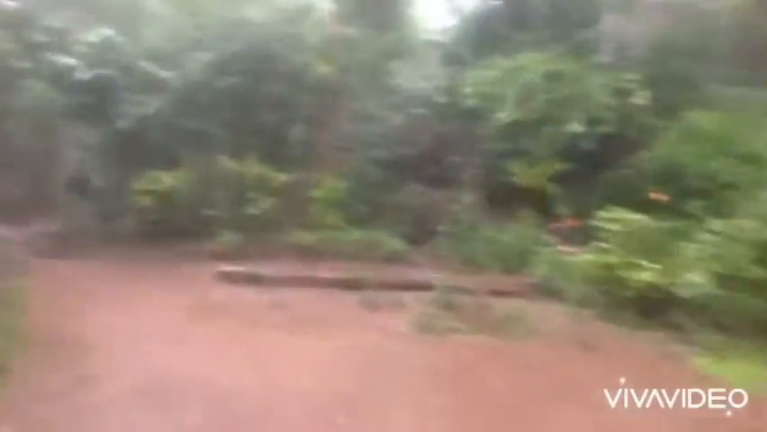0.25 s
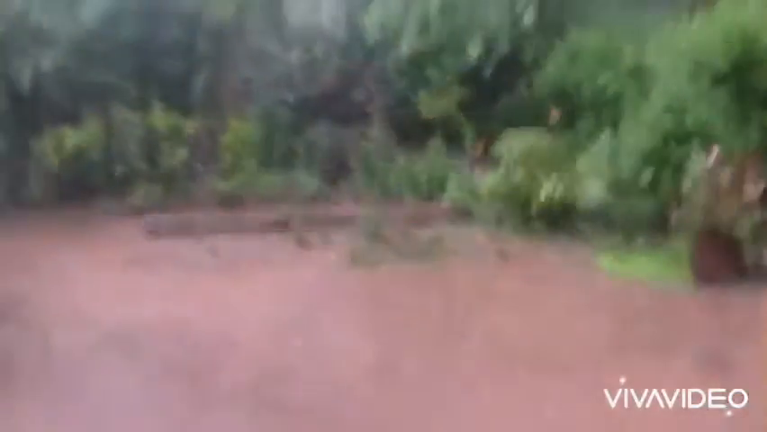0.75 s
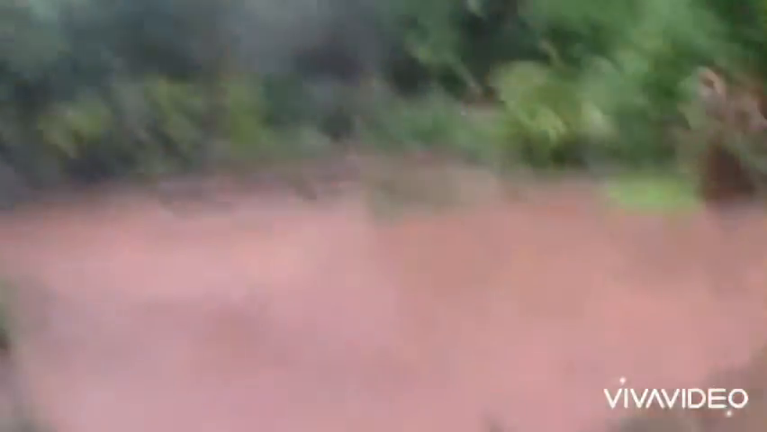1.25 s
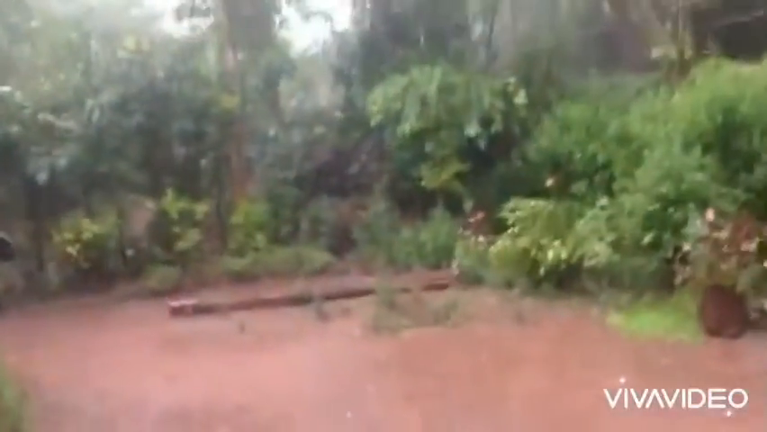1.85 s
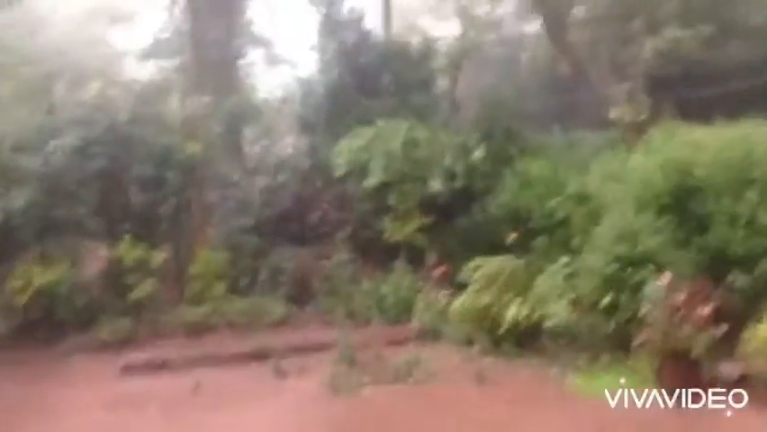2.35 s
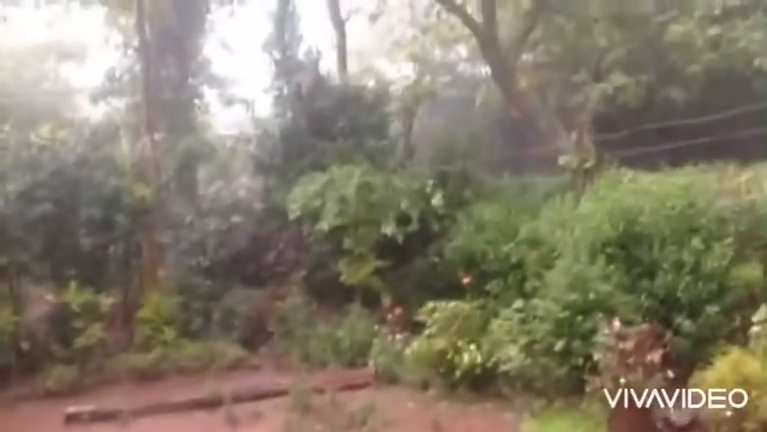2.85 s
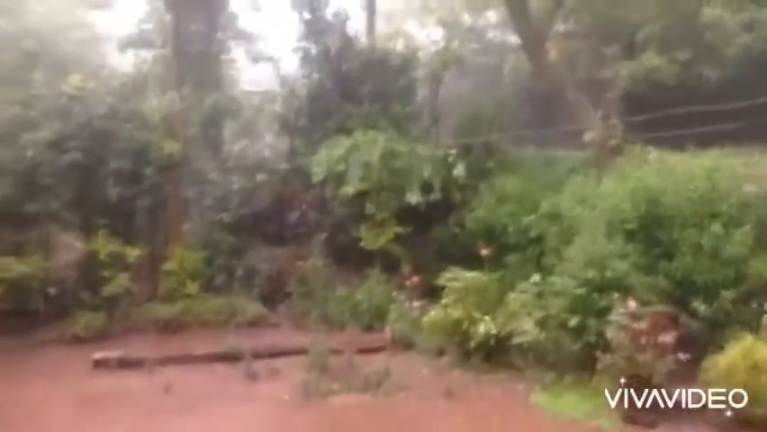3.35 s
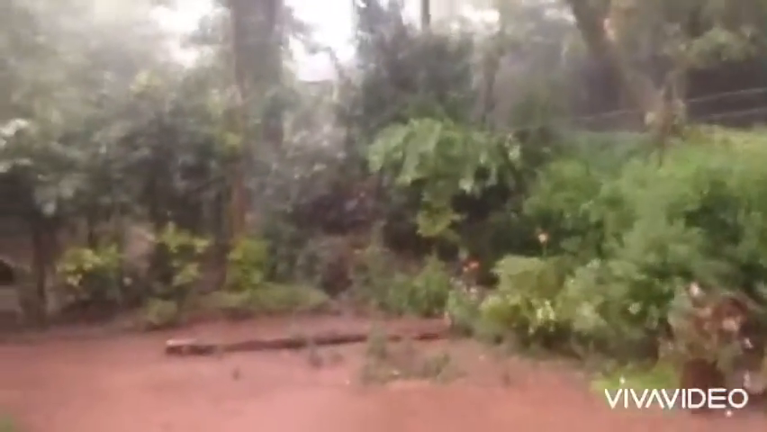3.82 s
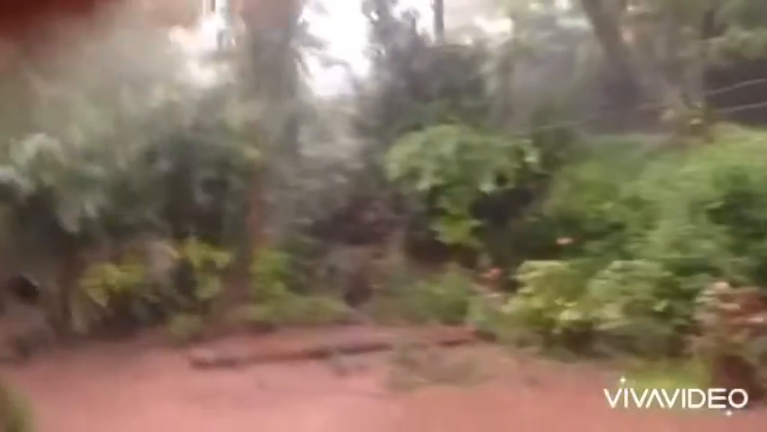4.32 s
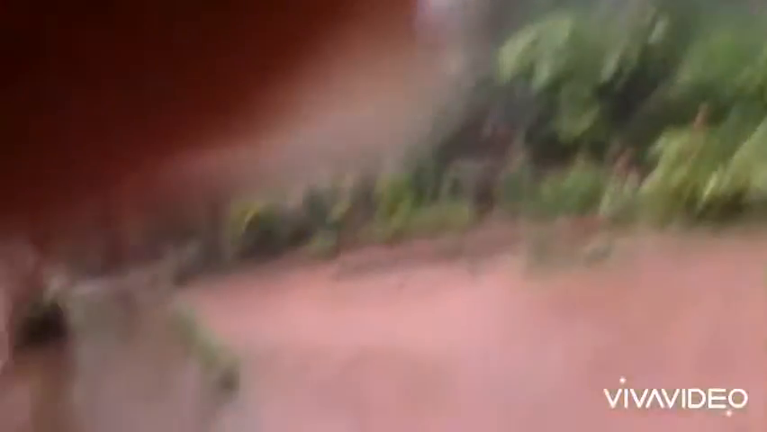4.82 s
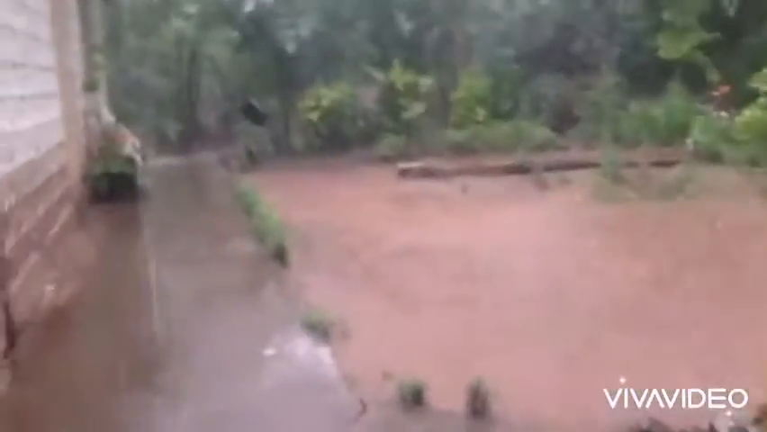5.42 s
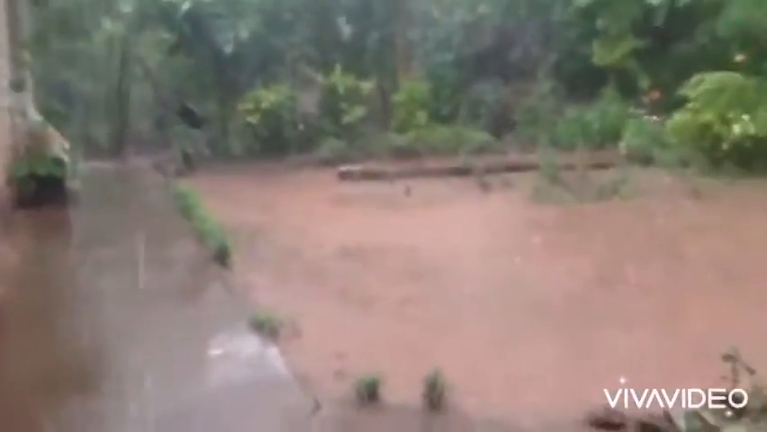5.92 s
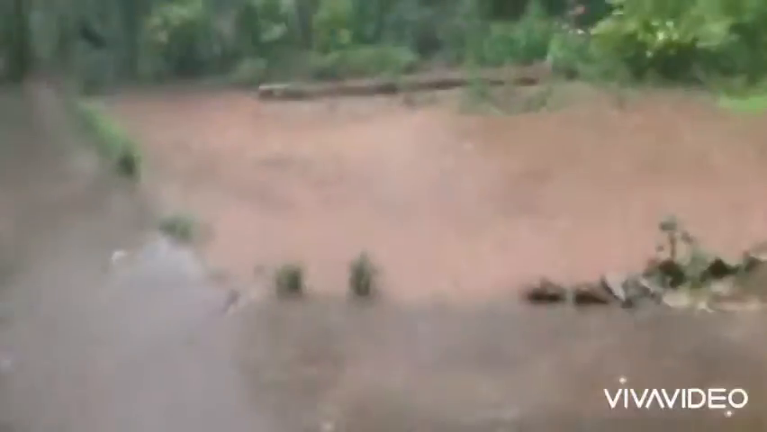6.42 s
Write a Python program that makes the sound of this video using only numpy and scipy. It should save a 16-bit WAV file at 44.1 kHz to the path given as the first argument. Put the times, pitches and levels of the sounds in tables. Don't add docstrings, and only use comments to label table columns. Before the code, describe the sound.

A heavy, unbroken downpour fills a flooded yard, heard from a porch on a single phone microphone: a dense midrange wash, crackling nearer drops and fine hiss, band-limited at the top. Sharp water slaps land close by at about 0.3 s and, much louder, at 0.5 s, ringing wetly with short echoes from walls. More follow near 0.9 s, a looser swelling spill around 1.5 s, and a heavier, lower slap at 1.75 s. Smaller splashes come at 2.0, 2.8, 3.4 and 3.6 s, while the rain grows slightly fuller. Around 4.2 s a bright splash and crisp ticks strike near. At 5.1 s the loudest slap bursts, nearly overloading; then the wash drops a little and single drops tick frequently until the end at about 6.7 s. Beneath, a roof sheet drums faintly with soft low thuds, and tiny drops patter.

```python
import sys
import numpy as np
from scipy import signal
from scipy.fft import rfft, irfft, next_fast_len
from scipy.io import wavfile
from scipy.ndimage import uniform_filter1d

SR = 44100
rng = np.random.default_rng(int(sys.argv[2]) if len(sys.argv) > 2 else 0)


def ratio(d):
    e = np.asarray(d, float) / 20
    return 10 ** e


def bounce(signal):
    frames = np.transpose(np.atleast_2d(signal))
    limited = np.clip(frames, -1, 1)
    pcm = np.round(limited * 32767).astype(np.int16)
    wavfile.write(sys.argv[1], SR, pcm)


N = 294147


def evened(x):
    return x / np.sqrt(np.mean(x ** 2) + 1e-20)


def read(points, hz):
    f, value = np.transpose(points)
    return np.interp(np.log(hz + 1), np.log(f + 1), value)


def over_time(table):
    s, *columns = np.transpose(table)
    return [np.interp(np.arange(N) / SR, s, column) for column in columns]


def filtered(x, points):
    size = next_fast_len(x.shape[-1])
    gain = ratio(read(points, np.fft.rfftfreq(size, 1 / SR)))
    return irfft(rfft(x, size) * gain, size)[..., :x.shape[-1]]


def coloured(x, points):
    return evened(filtered(x, points))


def resonate(x, hz, width):
    r = np.exp(-np.pi * width / SR)
    return signal.lfilter([1, 0, -1], [1, -2 * r * np.cos(2 * np.pi * hz / SR), r * r], x)


def layer(events):
    track = np.zeros(N)
    for s, sound in events:
        part = track[round(s * SR):][:len(sound)]
        part += sound[:len(part)]
    return track


def patchy(points, size, patchy_db, flicker_db):
    hop = size // 4
    frames, hz = N // hop + 5, np.fft.rfftfreq(size, 1 / SR)
    a, b, patches = rng.standard_normal((frames, len(hz), 3)).T
    patches = uniform_filter1d(patches, size=8, axis=0)
    patches = evened(uniform_filter1d(patches, size=24, axis=1))
    flicker = evened(uniform_filter1d(rng.standard_normal(frames), size=6))
    level_db = patchy_db * patches + flicker_db * flicker
    z = (a + 1j * b) * ratio(read(points, hz)[:, None] + level_db)
    return evened(signal.istft(z, nperseg=size, noverlap=size - hop)[1][:N])


def drops(per_s, spread_db, t60):
    size = ratio(spread_db * np.minimum(rng.exponential(1, N), 5))
    size = size * (rng.random(N) < per_s / SR)
    t = np.arange(3000) / SR
    power = signal.oaconvolve(size ** 2, ratio(-120 * t / t60))[:N]
    return evened(np.sqrt(abs(power)) * rng.standard_normal(N))


FIZZ_DB, HISS_DB = -40.5, -45
USUAL_POUR_DB = -28.5
FIZZ_FOLLOWS, HISS_FOLLOWS = 0.75, 0.2
FIZZ_NEAR, HISS_NEAR = 0.8, 1.2
# (time [s], strength [dB], closeness of the spray [dB])
POUR_RIDE = [(0.0, -28.5, -1.5), (0.95, -26.5, -0.5), (1.32, -30, 2), (1.56, -29.5, -1.5),
             (1.71, -28.5, 1.5), (1.82, -28, 2), (2.47, -29, 0.5), (2.73, -27.5, 2), (3.36, -27, 0.0),
             (3.66, -26, 1.5), (4.18, -26.5, 2.5), (5.11, -28.5, 1.5), (5.24, -31.5, -1),
             (5.48, -31.5, 0.5), (5.98, -30, 0.5), (6.67, -32.5, 1.5)]
# (frequency [Hz], level [dB per Hz])
WASH_SPECTRUM = [(180, -23.5), (300, -4), (450, -5.5), (650, -3), (900, -0.5), (1500, 0.5), (2000, 1),
                 (2400, 0.5), (2650, -5), (2850, -10.5), (3300, -24.5), (4300, -47), (7000, -100)]
# (frequency [Hz], level [dB per Hz])
FIZZ_SPECTRUM = [(1500, -10), (2700, 1), (3300, 6.5), (4500, 3), (5500, -5), (7000, -12), (9000, -38)]
# (frequency [Hz], level [dB per Hz])
HISS_SPECTRUM = [(3000, -43), (5000, 5), (6500, 2.5), (8000, 2), (9400, 1.5), (10000, -7), (10700, -53)]


def downpour():
    wash_db, close_db = over_time(POUR_RIDE)
    change_db = wash_db - USUAL_POUR_DB
    fizz_db = FIZZ_DB + FIZZ_FOLLOWS * change_db + FIZZ_NEAR * close_db
    hiss_db = HISS_DB + HISS_FOLLOWS * change_db + HISS_NEAR * close_db
    near = drops(per_s=400, spread_db=1.0, t60=0.04)
    wash = patchy(WASH_SPECTRUM, size=512, patchy_db=1.0, flicker_db=0.17)
    wash = evened(wash + ratio(-14.5) * coloured(near, WASH_SPECTRUM))
    fizz = patchy(FIZZ_SPECTRUM, size=256, patchy_db=0.0, flicker_db=1.06)
    fizz = evened(fizz + ratio(-16.5) * coloured(near, FIZZ_SPECTRUM))
    hiss = patchy(HISS_SPECTRUM, size=256, patchy_db=2.6, flicker_db=0.4)
    hiss = evened(hiss + coloured(near, HISS_SPECTRUM))
    return ratio(wash_db + 0.07) * wash + ratio(fizz_db) * fizz + ratio(hiss_db) * hiss


YARD_DB, YARD_LONGER = -15.5, 3.1
# (frequency [Hz], level [dB per Hz])
SPRAY_SPECTRUM = [(2000, -8), (3000, 7), (4500, 2.5), (6000, -3.5), (9300, -7.5), (10000, -14),
                  (10700, -41)]


def splash(db, hz, low_db, spray_db, t60, rise, weight):
    t = np.arange(SR // 2) / SR
    a, b, c = rng.standard_normal((len(t), 3)).T
    yard = ratio(YARD_DB + 60 * t / t60 * (1 - 1 / YARD_LONGER))
    swell = (1 - np.exp(-(t / rise) ** 2)) * (1 + yard)
    fade = ratio(-60 * t / t60)
    body = evened(resonate(coloured(a, WASH_SPECTRUM), hz, width=1400)) * fade
    low = ratio(low_db - 0.5) * coloured(b, weight) * fade
    spray = ratio(spray_db) * coloured(c, SPRAY_SPECTRUM) * ratio(-60 * t / (0.98 * t60))
    return ratio(db - 7.5) * swell * (body + low + spray)


# (time [s], peak [dB], ring [Hz], low weight [dB], spray [dB])
SLAP_EVENTS = [(0.077, -14, 2110, -18, -12.5), (.267, -18, 1690, -30, -25), (.306, -10, 1990, -19, -8),
               (.48, -4, 1710, -29, -20), (.928, -12, 1770, -5.5, -10), (.94, -11.5, 1750, -7.5, -10.5),
               (1.337, -20, 2230, -14, -23), (1.753, -9, 1370, -2.5, -17), (2.041, -16.5, 1440, -8.5, -4),
               (2.828, -13.5, 2260, -19, -6), (3.399, -9, 1900, -23.5, -6.5), (3.59, -15, 2070, -26, -9.5),
               (3.844, -22, 2300, -21, -6), (4.198, -16.5, 1810, -23, -3), (4.219, -12, 1900, -25, -17),
               (5.114, -2, 1700, -14, -14), (5.127, -11.5, 1510, 4, -21)]
# (frequency [Hz], level [dB per Hz])
SLAP_WEIGHT = [(200, -15), (450, -7.5), (600, 5), (1000, 5), (1500, 14.5), (2500, -28.5)]


def slaps():
    return layer((s, splash(db, hz, low_db, spray_db, t60=0.24, rise=0.0015, weight=SLAP_WEIGHT))
                 for s, db, hz, low_db, spray_db in SLAP_EVENTS)


# (time [s], peak [dB], low weight [dB], spray [dB], t60 [s])
SPILL_EVENTS = [(.005, -18.5, -12, -10, 0.57), (.252, -12, -13, -13.5, .19), (.462, -14, -42, -5.5, 0.16),
                (1.0, -18, -31, -12.5, 0.59), (1.505, -18, -5, -6.5, 0.39), (1.527, -12.5, 1, -7, 0.38),
                (1.561, -18, -13, -17, .53), (1.607, -13, -5.5, -4, 0.25), (2.0, -19.5, -13, -10, 0.19),
                (2.462, -22, -9.5, -2.5, 0.7), (2.54, -17.5, -13, -17, .4), (2.6, -27, -21, 0.5, 0.2),
                (3.041, -21, -11, -6.5, 0.58), (4.19, -21.5, -32, -2, 0.2)]
# (frequency [Hz], level [dB per Hz])
SPILL_WEIGHT = [(150, -20), (260, -5), (600, 3.5), (1000, -3), (1500, 2), (2500, -43)]


def spills():
    return layer((s, splash(db, 1980, low_db, spray_db, t60, rise=0.009, weight=SPILL_WEIGHT))
                 for s, db, low_db, spray_db, t60 in SPILL_EVENTS)


def ring(db, hz, cycles):
    t = np.arange(SR // 8) / SR
    rise = cycles / hz
    return ratio(db) * np.sin(2 * np.pi * hz * t) * (t / rise) * np.exp(1 - t / rise)


# (time [s], peak [dB], pitch [Hz])
RING_EVENTS = [(.3055, -9, 1980), (.3062, -13.5, 6040), (.308, -8.5, 2190), (.4795, -3, 1840),
               (.485, -3, 2040), (.493, -2.5, 1740), (.4975, -5.5, 1950), (.934, -8.5, 2200),
               (.942, -8, 1860), (.949, -18, 1380), (1.545, -20, 880), (1.565, -33, 702),
               (1.7495, -12, 1206), (1.755, -7, 1350), (1.767, -13, 1000), (2.829, -26, 2140),
               (2.836, -21, 2410), (3.399, -16.5, 5000), (3.399, -14, 1385), (3.4, -18, 3430),
               (3.401, -18, 2200), (3.405, -14.5, 1290), (3.589, -15, 1960), (4.188, -20, 5000),
               (4.197, -16, 1570), (5.1135, -5, 1840), (5.118, -16.5, 630), (5.12, -5, 1913),
               (5.128, -5, 1990), (5.13, -11, 870)]


def water_rings():
    return layer((s, ring(db, hz, cycles=3.23)) for s, db, hz in RING_EVENTS)


def tick(db, hz, t60=0.17):
    t = np.arange(SR // 8) / SR
    a, b = rng.standard_normal((len(t), 2)).T
    crack = evened(resonate(a, hz, width=2700)) * ratio(-60 * t / 0.036)
    tail = ratio(-8) * coloured(b, SPRAY_SPECTRUM) * ratio(-60 * t / t60)
    return ratio(db - 12) * np.minimum(t / 0.0015, 1) * (crack + tail)


# (time [s], peak [dB], pitch [Hz])
TICK_EVENTS = [(0.3082, -14, 5630), (.365, -21, 3770), (0.6777, -21, 3600), (2.784, -22, 3800),
               (3.2816, -18, 4410), (3.396, -19, 3870), (3.7818, -18, 3630), (3.846, -20, 4830),
               (4.1879, -9, 5050), (4.2314, -14.5, 4180), (4.436, -16, 5370), (4.6053, -16, 4340),
               (4.755, -17, 5380), (4.8198, -17, 5220), (4.852, -25, 5210), (4.9665, -16, 4510),
               (5.044, -23, 4640), (5.2545, -19, 4450), (5.3022, -22, 4590), (5.7971, -23, 3680),
               (5.9139, -17.5, 3680), (5.9967, -21, 4130), (6.1844, -19.5, 3810), (6.2214, -20, 3740),
               (6.3395, -18.5, 4090), (6.3662, -16.5, 4900), (6.4133, -17, 4260), (6.4597, -19, 4620),
               (6.5289, -19.5, 4740), (6.5444, -19, 4280)]


def ticks():
    return layer((s, tick(db, hz)) for s, db, hz in TICK_EVENTS)


# (time [s], peak [dB], pitch [Hz])
THUD_EVENTS = [(.085, -29.5, 42), (0.096, -20, 156), (.119, -19, 160), (0.268, -27, 157),
               (.977, -28.5, 156), (1.477, -46, 103), (1.902, -19.5, 93.3), (1.943, -21, 100),
               (2.56, -21, 121), (2.834, -23.5, 111), (3.132, -34, 124), (3.527, -19, 121),
               (3.692, -21, 224), (3.858, -23, 80), (4.1, -26.5, 90), (4.437, -32.5, 102),
               (4.568, -22, 163), (5.109, -29, 173), (5.719, -27, 167), (6.467, -29.5, 80)]


def thuds():
    return layer((s, ring(db - 4, hz, cycles=1.46)) for s, db, hz in THUD_EVENTS)


def struck(blows, modes):
    return evened(sum(ratio(db) * evened(resonate(blows, hz, width)) for hz, width, db in modes))


GROUP_DB = -3.5
UPPER_LEAN, LOWER_LEAN = -0.3, -0.6
# (time [s], drumming [dB], lean towards the main mode [dB])
ROOF_RIDE = [(0.0, -38, 5.5), (0.15, -37.5, 0.0), (0.33, -36.5, 2), (0.89, -36.5, 3.5), (1.54, -35.5, 1),
             (1.65, -36.5, 4), (2.13, -36.5, 2), (2.4, -38, -2.5), (2.79, -35, -2), (3.42, -34, -0.5),
             (3.73, -33.5, -0.5), (3.81, -34, -3), (5.39, -36, 2), (5.85, -36, 0.0), (6.32, -37.5, 5.5),
             (6.67, -36, -6.5)]
# (frequency [Hz], width [Hz], level [dB])
MAIN_ROOF_MODE = [(162.7, 15, 0)]
UPPER_ROOF_MODES = [(220.4, 3.3, -7), (283, 25, -7.5)]
LOWER_ROOF_MODES = [(44, 10, -18), (80, 22, 3), (121, 9.4, 7.5)]
# (frequency [Hz], level [dB per Hz])
BOOM_SPECTRUM = [(90, -33), (140, 0.5), (190, 6), (280, 1.5), (400, -13), (700, -36)]
# (frequency [Hz], level [dB per Hz])
RUMBLE_SPECTRUM = [(15, -47), (32, -19), (42, -9.5), (75, 4.5), (125, 5.5), (160, -8), (250, -43.5)]


def roof():
    drum_db, lean_db = over_time(ROOF_RIDE)
    blows = drops(per_s=300, spread_db=3.0, t60=0.053)
    main = struck(blows, MAIN_ROOF_MODE)
    boom = patchy(BOOM_SPECTRUM, size=2048, patchy_db=0.8, flicker_db=1.1)
    upper = evened(boom + ratio(-6.5) * struck(blows, UPPER_ROOF_MODES))
    rumble = patchy(RUMBLE_SPECTRUM, size=2048, patchy_db=3.0, flicker_db=1.0)
    lower = evened(rumble + ratio(-6) * struck(blows, LOWER_ROOF_MODES))
    modes = ratio(lean_db) * main + ratio(UPPER_LEAN * lean_db) * upper + ratio(LOWER_LEAN * lean_db) * lower
    return ratio(drum_db + GROUP_DB) * modes


def patter():
    return ratio(-50) * coloured(drops(per_s=30, spread_db=4.0, t60=0.038), SPRAY_SPECTRUM)


def scene():
    mix = downpour() + slaps() + spills() + water_rings() + ticks() + thuds() + roof() + patter()
    return np.array([mix, mix])


# (time [s], level [dB], from [Hz], to [Hz])
SIDE_EVENTS = [
    (1.68, -46, 5500, 8500),
    (2.025, -49, 6200, 7700),
    (2.025, -58, 8900, 10500),
    (3.07, -48, 5140, 6500),
    (3.07, -51, 8140, 10500),
    (3.187, -54, 5100, 6500),
    (4.0, -48, 5130, 7100),
    (4.392, -45, 5500, 8500),
    (5.88, -56, 6700, 9100),
    (6.135, -52, 6700, 10500),
]


def side_noise():
    size = 2048
    swell = np.sin(np.pi * np.arange(size) / size)
    events = []
    for s, db, from_hz, to_hz in SIDE_EVENTS:
        band = [(from_hz - 60, -60), (from_hz, 0), (to_hz, 0), (to_hz + 60, -60)]
        noise = coloured(rng.standard_normal(size), band)
        events.append((s - size / 2 / SR, ratio(db) * noise * swell))
    return layer(events)


# (frequency [Hz], level [dB])
MIC_RESPONSE = [(10, -25), (25, -3.5), (40, 0), (10300, -0.5), (10450, -19), (10550, -22), (10700, -21.5),
                (10780, -46), (22050, -100)]


def microphone(dry):
    knee, room = 0.78, 0.17
    over = np.maximum(abs(dry) - knee, 0)
    soft = dry - np.sign(dry) * (over - room * np.tanh(over / room))
    return filtered(soft, MIC_RESPONSE)


def top_cut(x):
    return signal.sosfilt(signal.butter(12, 10770, fs=SR, output="sos"), x)


def record(dry):
    mix = microphone(dry) + side_noise() * [[1], [-1]]
    return top_cut(mix)


dry = scene()
out = record(dry)
bounce(out)
```